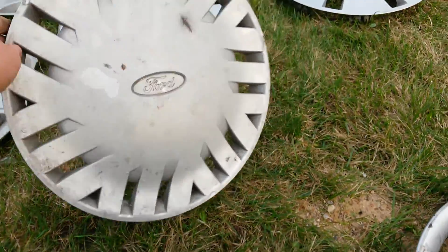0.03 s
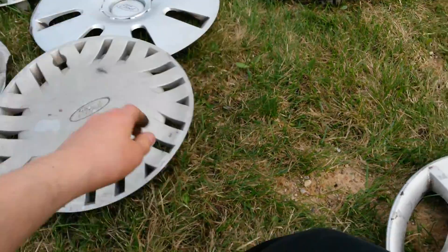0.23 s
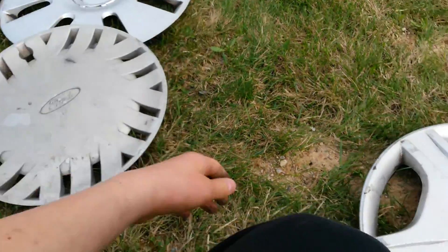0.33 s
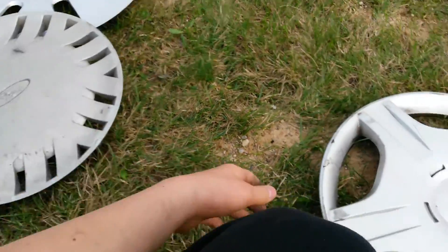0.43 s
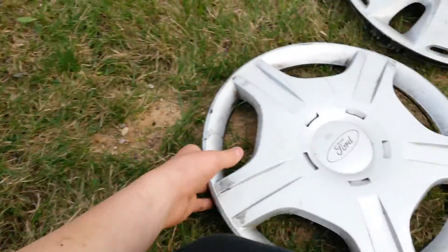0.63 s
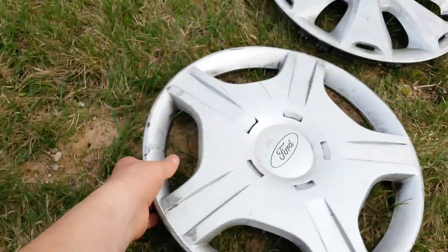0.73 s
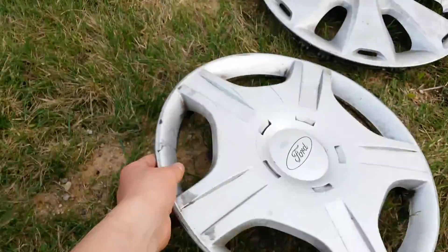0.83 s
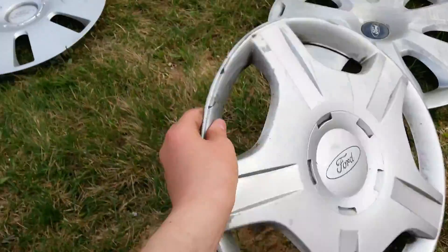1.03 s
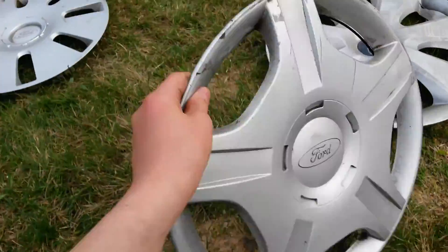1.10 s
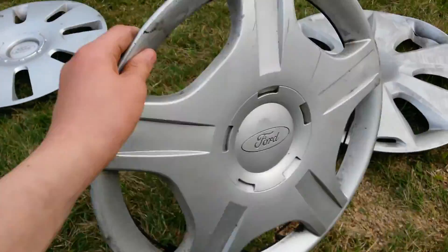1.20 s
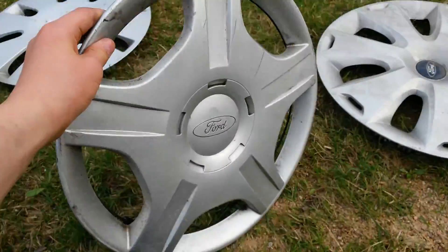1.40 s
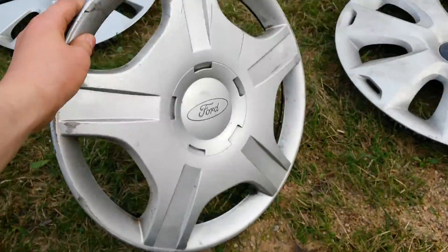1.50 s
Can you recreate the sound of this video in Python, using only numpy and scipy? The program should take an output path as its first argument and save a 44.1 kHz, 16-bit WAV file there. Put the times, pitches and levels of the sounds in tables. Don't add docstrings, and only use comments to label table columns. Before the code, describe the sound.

A plastic wheel cover is handled close to a hand-held stereo microphone outdoors. Faint grass brushing at 0.1 s, then a crunchy landing at 0.22 s with a low hum of the flexing disc. At 0.37 s a very loud, dry clack against another cover, a brief rattle, soft rocking and a tick at 0.49 s. Quiet rustle, tiny stem snaps and low air puffs around 0.8-1.4 s; light scraping contacts at 1.52 s.

```python
import sys
import numpy as np
from scipy import signal
from scipy.fft import rfft, irfft
from scipy.io import wavfile
from scipy.ndimage import uniform_filter1d, map_coordinates

SR = 44100
rng = np.random.default_rng(int(sys.argv[2]) if len(sys.argv) > 2 else 0)


def elevation(decibels):
    levels = np.asarray(decibels, float)
    return 10 ** (levels / 20)


def file_out(sig):
    cols = np.atleast_2d(sig).T
    lim = np.clip(cols, -1, 1)
    pcm = np.round(lim * 32767).astype(np.int16)
    wavfile.write(sys.argv[1], SR, pcm)


N = 68355

# [f/Hz, density/dB]
FIELD_SPECTRUM = [(15, -42.5), (25, -6.5), (44, -15.5), (229, -5), (614, -17), (1260, -15), (3390, -32.5),
                  (3670, -36.5), (14700, -31)]
# [f/Hz, width/Hz, level/dB]
ENGINES = [(96, 12, -69), (146, 30, -75.5)]
# [t/s, level/dB]
BREEZE_LEVEL = [(0., -99), (.2, -68), (.225, -64), (.26, -66), (.39, -65.5), (.6, -85), (1.0, -88),
                (1.2, -67.5), (1.4, -84.5)]
# [t/s, level/dB, dullness/dB, left-right/dB]
RUSTLE_MOVES = [(.078, -82, 4, 2), (.102, -59, -19.5, -6), (.148, -53.5, -5, -3.5), (.17, -78.5, 0.5, -4),
                (.215, -41.5, -8.5, -3.5), (.275, -53.5, -15, 1.5), (.354, -57, -8, -5),
                (.47, -57.5, -4, -1), (.54, -77, 8, -3), (.75, -65.5, -11.5, 0.5), (.82, -72.5, -12, 4),
                (.88, -70.5, -4.5, 5), (.94, -75, -12, 3.5), (1.02, -64.5, -9.5, 0),
                (1.17, -59.5, -16.5, 4), (1.25, -73, -3.5, 1), (1.51, -73, 7, 6), (1.55, -51.5, 7.5, 1)]
# [f/Hz, density/dB]
BLADE_SPECTRUM = [(240, -59.5), (400, -14), (658, -12.5), (1320, -13), (1440, -14), (4020, -11.5),
                  (4330, -10), (7350, -8), (14700, -26)]
# [crack/dB, shell/dB, chatter/s, left lag/ms, thinness/0-1]
CONTACTS = [(-10, -44, 0.004, 0.13, 0.04), (-24, -61, 0.0041, .05, 0.6), (-34, -45, 0.0032, 0.065, .5),
            (-33, -64, 0.0025, 0.051, 0.54), (2, -8, 0.002, 0.17, 0), (-19, -26, 0.0045, 0.078, 0.4),
            (-20, -16, 0.00025, 0.1, 0.2), (-28, -49, 0.0016, 0.17, 0.9), (-16, -35, 0.0005, 0.3, .8),
            (-42.5, -54, 0.0018, 0.018, 0.3), (-26, -50.5, 0.0017, 0.011, 0.1), (-15.5, -53, .002, .07, .1),
            (-24, -60.5, .002, 0.06, 0.5), (-25.5, -55.5, 0.0024, 0.06, 0.7),
            (-35, -30.5, 0.0011, 0.11, .5), (-30.5, -27, 0.0018, .14, 0.6), (-27.5, -49.5, 0.0025, .3, 1),
            (-46, -85, 0.0024, 0.084, 0.7), (-26.5, -28.5, 0.00033, .14, 0.5)]
CONTACT_S = [.2169, .2385, .257, .322, .3682, .3774, .3914, .4092, .4937, 1.5205, 1.5475, .2215, .2345,
             .2425, .3972, .4022, .496, .1015, .3822]
# [t/s, crack/dB, shell/dB, chatter/s, left lag/ms]
STEM_SNAPS = [(0.81, -63, -83, .0004, -0.11), (0.832, -47.5, -83, .0004, -0.097),
              (1.027, -49.5, -74, .001, 0.027), (1.155, -58.5, -82, 0.0019, -0.11),
              (1.179, -48, -51, 0.0027, -0.14), (1.186, -53, -63, .001, -.1),
              (1.251, -50, -75, 0.00087, -0.042), (1.285, -49, -80, 0.00044, -0.041),
              (1.296, -55, -67, 0.00033, -0.082), (1.378, -64, -88, .0004, .02)]
# [f/Hz, density/dB]
CRACK_SPECTRUM = [(300, -28.5), (1200, -16.5), (2800, -7.5), (4500, 10), (6300, 6.5), (8500, 4.5),
                  (11000, -16), (14500, -18)]
# [f/Hz, level/dB, t60/s]
SHELL_MODES = [(770, -11.5, 0.047), (874, -14.5, 0.041), (1085, 2.5, 0.022), (1351.4, -13.5, 0.079),
               (1592, 3.5, 0.043), (1798, -22, 0.029), (2070, -5, 0.04), (2199, 0.5, .04),
               (2710, -4.5, 0.035), (2372, -6, 0.05), (3770, -15.5, .03), (4190, -6.5, 0.034),
               (4807, -9.5, 0.031), (5500, -18, 0.069)]
# [t/s, level/dB, brightness/dB]
RATTLE_LEVEL = [
    (.367, -71.5, -15),
    (.371, -12, -14.5),
    (.379, -10.5, -3.5),
    (.389, -31, -2.5),
    (.403, -29, -10),
    (.42, -50, -27),
    (.455, -46.5, -12),
    (.485, -55.5, -15.5),
    (.53, -71.5, -30),
]
# [t/s, level/dB]
RIM_ROCKS = [
    (0.4345, -40),
    (0.442, -54),
    (0.4478, -39.5),
    (0.4569, -54.5),
    (0.461, -48),
]
# [t/s, f/Hz, level/dB]
AIR_PUFFS = [(1.055, 97, -49), (1.078, 92, -47.5), (1.103, 62, -44), (1.147, 90, -51), (1.172, 110.5, -44),
             (1.209, 139, -52.5), (1.241, 120, -58), (1.272, 85, -50), (.228, 45, -48), (.39, 40, -57.5),
             (.72, 94.5, -57), (.79, 170, -63), (.11, 91, -56), (0.116, 239, -59), (.17, 260, -62),
             (.315, 270, -61), (0.344, 230, -60), (1.529, 300, -49.5), (0.909, 89.4, -58),
             (1.125, 76, -47.5)]
# [t/s, f/Hz, level/dB, swell/s, t60/s]
FLEX_RINGS = [(0.222, 122, -32.5, 0.0055, 0.51), (.218, 282, -42, 0.0011, 0.071),
              (.225, 660, -55, .005, 0.32), (0.218, 1510, -36, 0.0015, 0.05),
              (0.215, 2497, -32.5, 0.0016, 0.019), (0.443, 1480, -55, .006, .15),
              (0.37, 121.2, -38, 0.0037, 0.36), (0.367, 214.5, -36, .002, .1),
              (.368, 335, -38.5, 0.0028, 0.16), (.368, 459, -32, .001, .06), (.369, 643.4, -34, 0.0024, .2),
              (0.401, 409.6, -45, 0.0054, .4), (0.408, 184.5, -48.5, .01, .4),
              (.445, 676, -51, 0.0038, 0.3), (.494, 333, -50, 0.0027, 0.083),
              (0.495, 130, -52, 0.0044, 0.29)]
DAMPING_S = (.342, .49, .54)
# [f/Hz, left-right/dB]
PORT_COLOUR = [(60, -7.5), (110, -3.5), (200, -4), (370, -3), (680, -3), (1250, -1), (2300, 8), (4230, 6.5),
               (7760, -1), (14200, -9.5)]
# [f/Hz, width/Hz, level/dB]
PORT_CAVITIES = [(7300, 980, 8), (8500, 2700, 10.5)]

FIELD_DB, ALIKE_BELOW_HZ = -70.5, 530
BREEZE_HZ, BREEZE_PUFFS_PER_S, BREEZE_PUFF_DB = 85, 210, 5.5
RUSTLE_PER_S, RUSTLE_SCATTER_DB, RUSTLE_FLICKER_DB = 7000, 1.5, 2.83
DULL_HZ, DULL_DB = 3700, -4.5
CHATTER_FALL, CHATTER_SPIKE = 1.7, 0.36
SNAP_THINNESS = 1
RATTLE_PER_S, RATTLE_SCATTER_DB, RATTLE_CRACK_DB = 7000, 1.2, -13
ROCK_PUSH_S, ROCK_BELOW_HZ = 0.00061, 1200
KNOCK_HZ, KNOCK_WIDTH_HZ, KNOCK_DB = 1964, 1500, 32
SCATTER_S, SCATTER_DB, GROUND_S, GROUND_DB = .003, -6, .02, -14
THIN_BELOW_HZ = 250
PUFF_CYCLES = 0.28
WOBBLE, WAVER_DB, STOP_S = .014, 2.5, 0.032
CEILING, TOP_HZ = 1, 15600


def unit(x):
    return x / np.sqrt(np.mean(x ** 2))


def line(table, col=1):
    rows = np.array(table)
    return np.interp(np.arange(N) / SR, rows[:, 0], rows[:, col])


def colour(x, table, size=2048):
    hz, db = np.array(table).T
    bin_hz = np.arange(size // 2 + 1) * SR / size
    gain = elevation(np.interp(np.log(bin_hz + 1), np.log(hz), db))
    cepstrum = irfft(np.log(gain))
    cepstrum[1:size // 2] *= 2
    cepstrum[size // 2 + 1:] = 0
    impulse = irfft(np.exp(rfft(cepstrum)))
    return signal.fftconvolve(x, np.atleast_2d(impulse), axes=1)[:, :N]


def band(x, hz, width_hz):
    return signal.lfilter(*signal.iirpeak(hz, hz / width_hz, SR), x)


def mode(x, hz, t60_s):
    pole = np.exp((2j * np.pi * hz - np.log(1000) / t60_s) / SR)
    return signal.lfilter([1], [1, -pole], x).imag


def walk(rate_hz):
    k = int(SR / rate_hz)
    steps = np.repeat(rng.standard_normal((2, N // k + 1)), k, axis=1)
    return unit(uniform_filter1d(uniform_filter1d(steps, k), k)[:, :N])


def clicks(per_s, scatter_db, channels=1):
    shape = (channels, N)
    present = rng.random(shape) < per_s / SR
    sign = np.sign(rng.standard_normal(shape))
    return unit(present * sign * elevation(scatter_db * rng.exponential(size=shape)))


def late(x, lag_ms):
    left = map_coordinates(x, [np.arange(len(x)) - lag_ms * SR / 1000])
    return np.array([left, x])


def tail(t60_s, db):
    t = np.arange(int(.08 * SR)) / SR
    spray = rng.standard_normal((2, len(t))) * 1000. ** (-t / t60_s)
    return elevation(db) * spray / np.sqrt(np.sum(spray ** 2, axis=1, keepdims=True))


def outdoors():
    mid, side = colour(rng.standard_normal((2, N)), FIELD_SPECTRUM, size=8192)
    side = signal.lfilter(*signal.butter(1, ALIKE_BELOW_HZ, "high", fs=SR), side)
    field = unit(np.array([mid + side, mid - side])) * elevation(FIELD_DB + 2.4 * walk(15)[0])
    engines = sum(elevation(db) * unit(band(rng.standard_normal(N), hz, width_hz)) for hz, width_hz, db in ENGINES)
    breeze = rng.standard_normal((2, N)) + 1.5 * rng.standard_normal(N)
    breeze = breeze * elevation(line(BREEZE_LEVEL) + 24.5 + BREEZE_PUFF_DB * walk(BREEZE_PUFFS_PER_S)[0])
    for width_hz in (130.0, 150.0, 300.0):
        breeze = band(breeze, BREEZE_HZ, width_hz)
    return field + engines + breeze


def grass():
    bright = unit(colour(clicks(RUSTLE_PER_S, RUSTLE_SCATTER_DB, channels=2), BLADE_SPECTRUM))
    dull = unit(band(clicks(RUSTLE_PER_S / 2, RUSTLE_SCATTER_DB), DULL_HZ, 4000.))
    dull = dull * elevation(DULL_DB + line(RUSTLE_MOVES, col=2))
    pan_db = line(RUSTLE_MOVES, col=3) * np.array([[.5], [-.5]])
    return (bright + dull) * elevation(line(RUSTLE_MOVES) + 1 + pan_db + RUSTLE_FLICKER_DB * walk(90))


def contacts():
    crack, blows = np.zeros((2, N + 2000)), np.zeros((2, N + 2000))
    age_s = np.arange(1024) / SR
    rows = [(s, *contact) for s, contact in zip(CONTACT_S, CONTACTS)]
    rows += [(*snap, SNAP_THINNESS) for snap in STEM_SNAPS]
    for s, crack_db, shell_db, chatter_s, lag_ms, thin in rows:
        burst = rng.standard_normal(1024) * np.abs(rng.standard_normal(1024)) ** CHATTER_SPIKE
        burst *= np.exp(-(age_s / chatter_s) ** CHATTER_FALL)
        burst[0] = 1.8
        burst = late(np.r_[np.zeros(32), burst], lag_ms) / 3
        at = int(s * SR) - 32
        crack[:, at:at + 1056] += elevation(crack_db) * signal.lfilter([1, -min(thin, 1)], [1], burst)
        blows[:, at:at + 1056] += elevation(shell_db) * burst / np.sqrt(np.sum(burst[1] ** 2))
    return crack[:, :N], blows[:, :N]


def rattling():
    run = clicks(RATTLE_PER_S, RATTLE_SCATTER_DB)[0]
    return late(run * elevation(line(RATTLE_LEVEL) - 27.5), 0.26)


def rocking():
    t = np.arange(N) / SR
    pushes = sum(elevation(db) * np.exp(-((t - s) / ROCK_PUSH_S) ** 2) for s, db in RIM_ROCKS)
    rough = uniform_filter1d(rng.standard_normal(N), size=14)
    return signal.lfilter(*signal.butter(2, ROCK_BELOW_HZ, fs=SR), pushes * rough)


def knocks():
    crack, blows = contacts()
    rocks = rocking()
    rattle = rattling()
    blows = blows + rattle + rocks
    shell = sum((-1) ** k * elevation(db - 8.5) * mode(blows, hz, t60_s)
                for k, (hz, db, t60_s) in enumerate(SHELL_MODES))
    knock = band(band(blows, KNOCK_HZ, KNOCK_WIDTH_HZ), KNOCK_HZ, 2 * KNOCK_WIDTH_HZ)
    rattle_crack = elevation(RATTLE_CRACK_DB + 29 + line(RATTLE_LEVEL, col=2)) * rattle
    crack = colour(crack + rattle_crack, CRACK_SPECTRUM)
    reflections = tail(SCATTER_S, SCATTER_DB) + tail(GROUND_S, GROUND_DB)
    crack = crack + signal.fftconvolve(crack, reflections, axes=1)[:, :N]
    mix = crack + shell + elevation(KNOCK_DB) * knock
    return signal.lfilter(*signal.butter(2, THIN_BELOW_HZ, "high", fs=SR), mix)


def puffs():
    t, out = np.arange(N) / SR, np.zeros((2, N))
    for s, hz, db in AIR_PUFFS:
        chance = rng.standard_normal((2, 1))
        swell = np.exp(-((t - s) * hz / PUFF_CYCLES) ** 2)
        out += elevation(db + 2 * chance) * swell * np.sin(2 * np.pi * hz * (t - s) + 1.7 * chance)
    return out


def flexing():
    out, t = np.zeros(N), np.arange(N) / SR
    for s, hz, db, swell_s, t60_s in FLEX_RINGS:
        age_s = np.maximum(t - s, 0)
        stop = min(d for d in DAMPING_S if d > s)
        shape = (1 - np.exp(-age_s / swell_s)) ** 2 * 1000. ** (-age_s / t60_s)
        shape *= np.exp(-np.maximum(t - stop, 0) / STOP_S)
        waver_db = WAVER_DB * min(hz / 400, 1) * walk(60)[0]
        cycles = hz * np.cumsum((t > s) * (1 + WOBBLE * walk(73)[0])) / SR
        out += elevation(db + waver_db) * shape * np.sin(2 * np.pi * cycles)
    return out


def scene():
    return knocks() + flexing() + grass() + outdoors() + puffs()


def low_pass(x):
    return signal.sosfilt(signal.butter(12, 14850, fs=SR, output="sos"), x)


def record(dry):
    ports = []
    for k, (hz, width_hz, db) in enumerate(PORT_CAVITIES):
        port = colour(dry[[k]], [(f, tilt_db * (.5 - k)) for f, tilt_db in PORT_COLOUR])[0]
        ports.append(port + (elevation(db) - 1) * band(port, hz, width_hz))
    clipped = np.clip(np.array(ports), -CEILING, CEILING)
    mix = signal.sosfilt(signal.butter(10, TOP_HZ, fs=SR, output="sos"), clipped)
    return low_pass(mix)


dry = scene()
out = record(dry)
file_out(out)
```